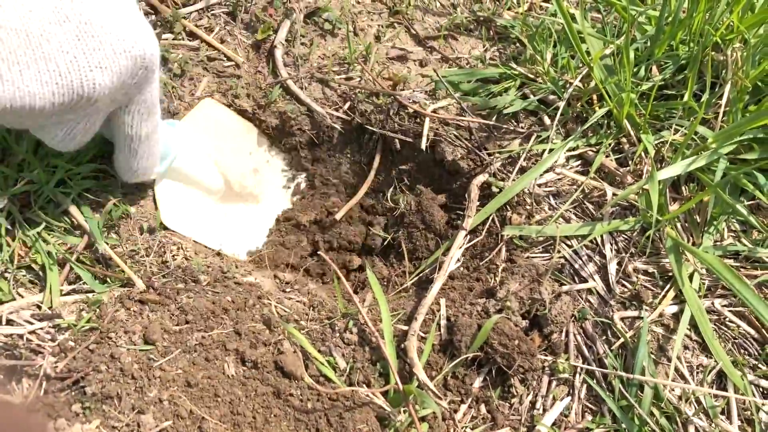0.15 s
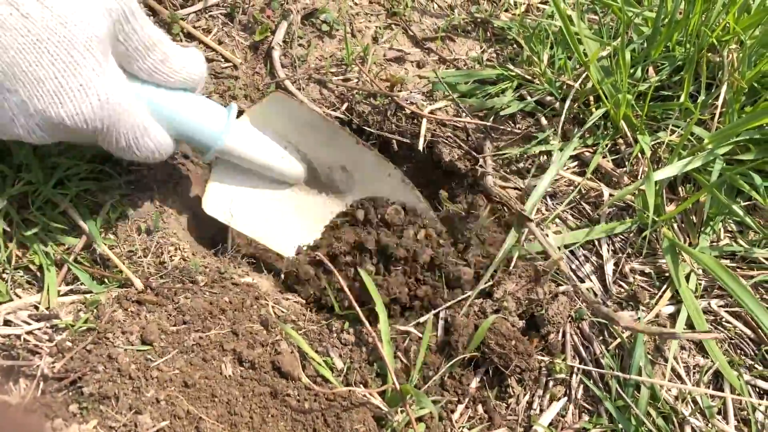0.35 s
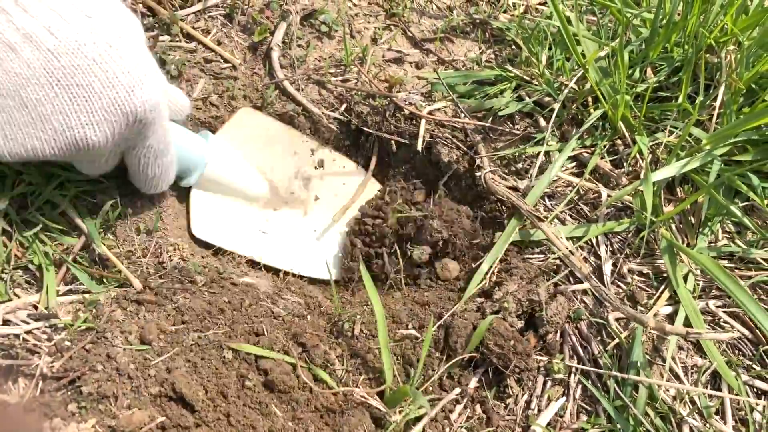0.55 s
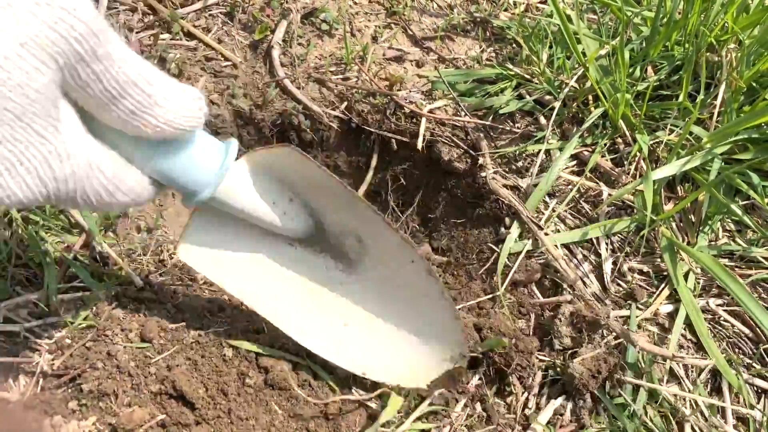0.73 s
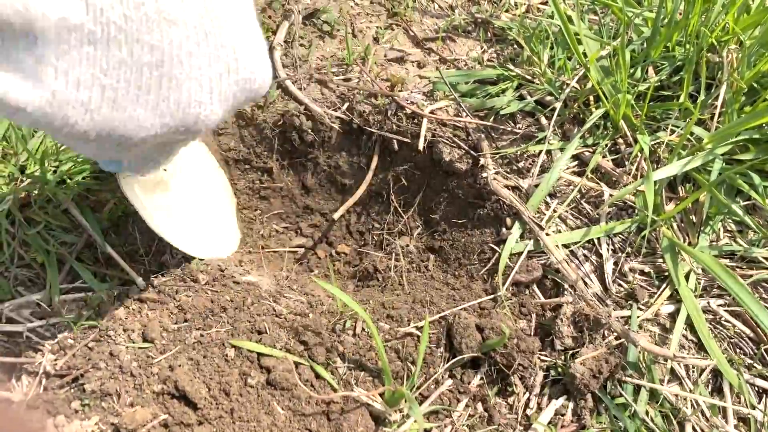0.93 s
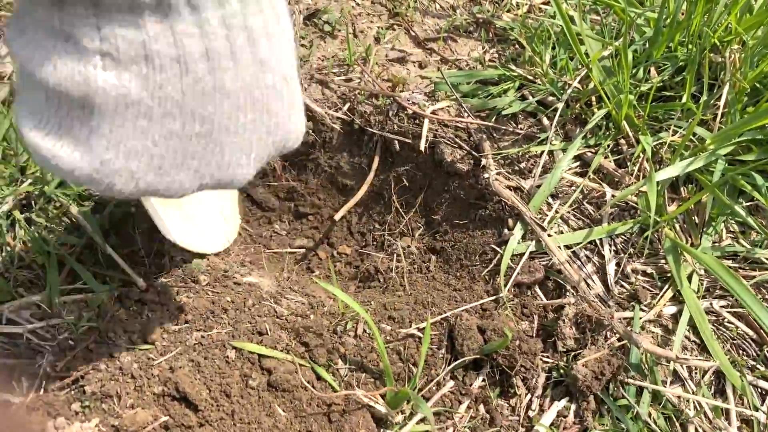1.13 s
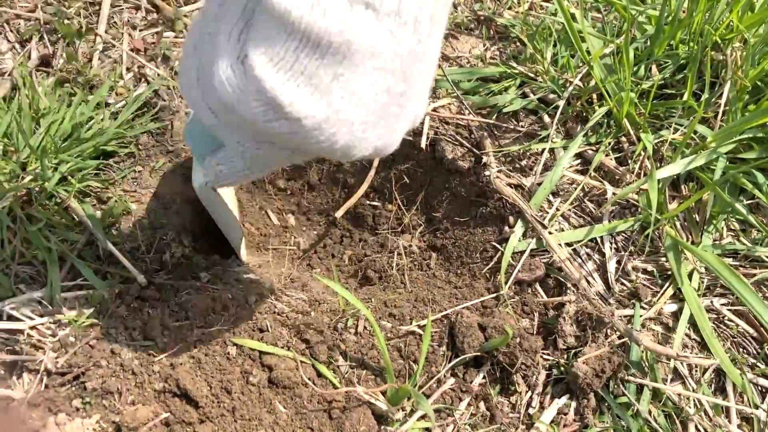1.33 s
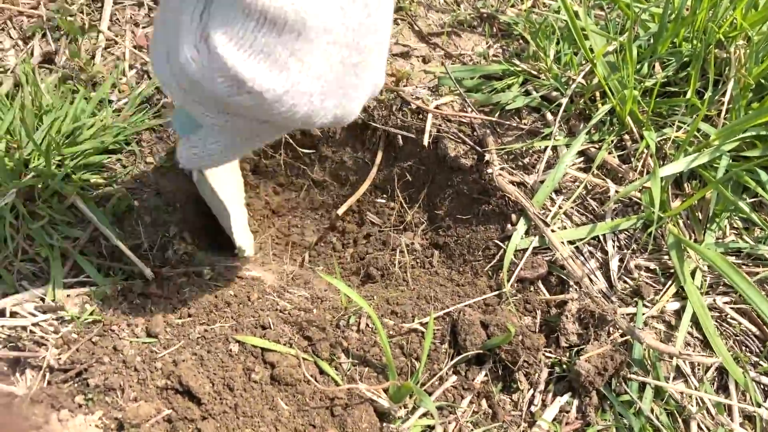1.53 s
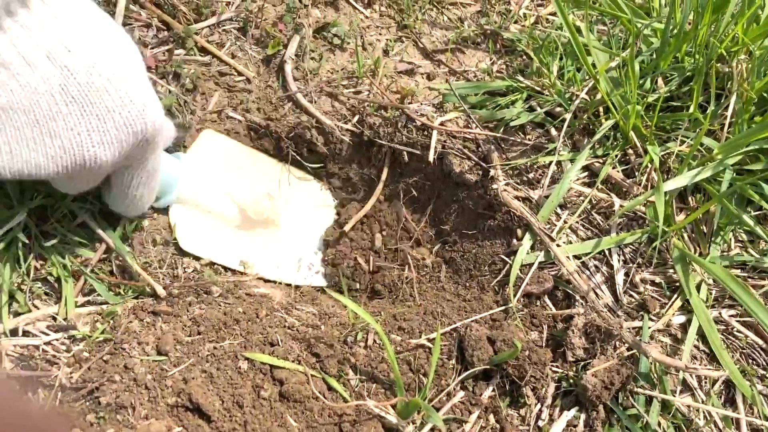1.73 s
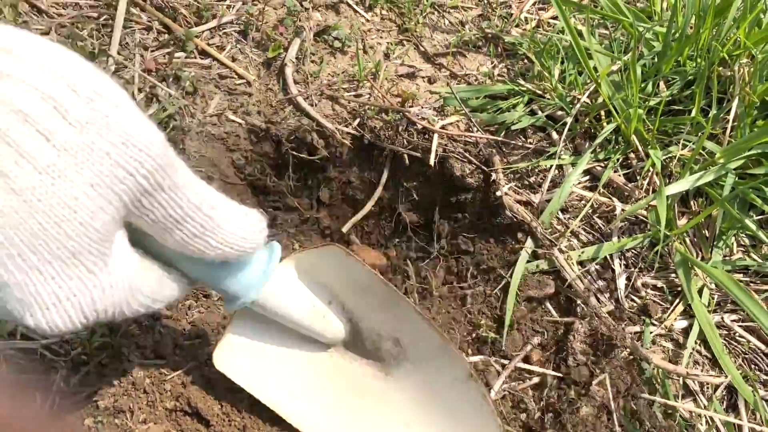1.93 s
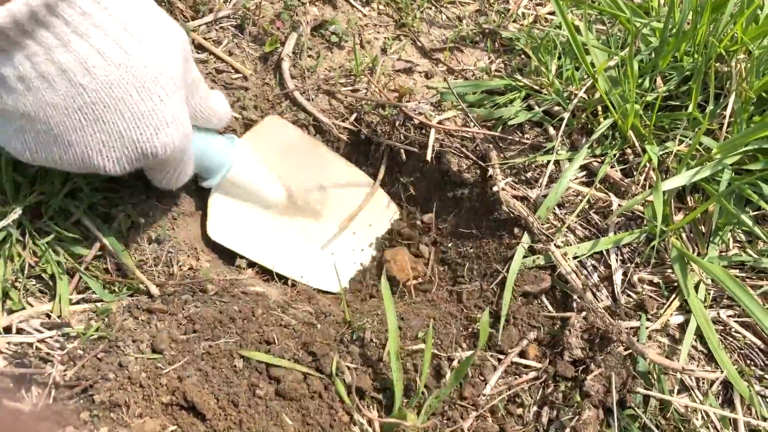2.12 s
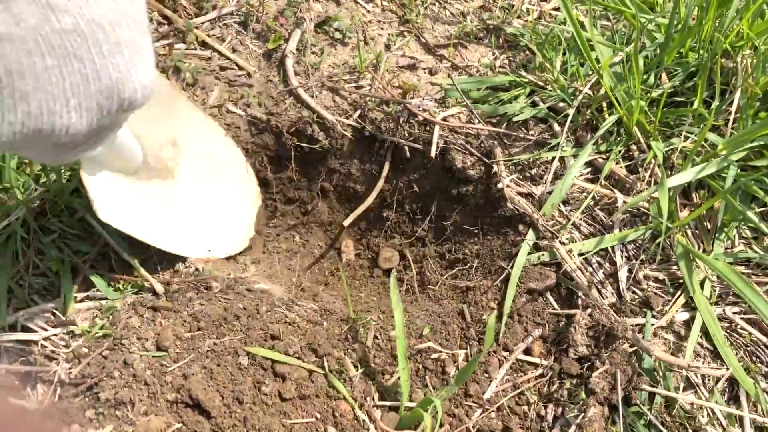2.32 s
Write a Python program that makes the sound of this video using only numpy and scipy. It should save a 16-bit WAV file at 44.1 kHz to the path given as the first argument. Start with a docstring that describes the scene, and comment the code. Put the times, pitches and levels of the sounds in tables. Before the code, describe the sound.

A hand trowel digs dry grassy soil in quick crisp scrapes, with stones clicking on its blade

```python
"""Outdoors in a garden, a hand trowel digs dry grassy soil in quick short strokes close to the microphone.
From the start grit noise grinds along the steel blade and rings its modes, while sparser, darker grains
crumble as clods; stones click on the edge, two of them hard just before 0.4 s. From 0.53 s thin tones sing
on the blade; the strongest stroke comes near 1.26 s, the strongest stone near 1.57 s, the strongest thud at
2.24 s. Filtered noise makes a low rumble and faint hiss behind it all; a drone swells near 0.5 and 1.64 s."""
import sys
import numpy as np
from scipy import signal
from scipy.fft import rfft, irfft, next_fast_len
from scipy.io import wavfile
from scipy.ndimage import uniform_filter1d, map_coordinates

SR = 44100
rng = np.random.default_rng(int(sys.argv[2]) if len(sys.argv) > 2 else 0)


def inscribe(sig):
    """Save sig as 16-bit PCM at rate SR to the path in sys.argv[1].

    A 1-D sig is mono; a 2-D sig holds one channel per row.
    Samples are clipped to [-1, 1] before scaling.
    """
    pcm = np.round(np.clip(np.atleast_2d(sig).T, -1, 1) * 32767)
    wavfile.write(sys.argv[1], SR, pcm.astype(np.int16))


def gain_from_db(level_db):
    """Convert decibel levels to linear amplitude factors (20 dB per decade)."""
    decades = np.asarray(level_db, float) / 20
    return 10 ** decades


N = 108927

# Colour of the distant rumble and air hiss. Each row: frequency in Hz, relative level in dB per Hz.
AIR_COLOUR = [(20, -15), (45, -4), (120, -0.5), (230, -3), (400, -16), (1000, -25), (4000, -30.5),
              (15000, -49), (16500, -46)]
# Drone of a distant engine. Each row: time in seconds, rms level in dB.
DRONE_LEVEL = [(.38, -66), (.5, -54.5), (.6, -67), (.72, -71), (1.32, -68.5), (1.5, -88), (1.64, -57),
               (1.8, -81), (2.47, -70)]
# The ground thuds under a hard push. Each row: start in seconds, frequency in Hz, envelope peak in dB.
GROUND_THUDS = [(0.152, 48.5, -54.5), (1.052, 170, -59), (1.49, 262, -45.5), (1.571, 342, -46),
                (2.2405, 585, -33.5)]
# Sliding grit sets one mode of the free blade singing. Each row: start in seconds, length in seconds,
# centre frequency in Hz, mean peak level in dB.
BLADE_SINGS = [(0.532, 0.017, 4670, -56), (0.715, 0.02, 5830, -47), (0.732, 0.013, 2953, -42.5),
               (0.816, 0.025, 2920, -60), (1.089, 0.042, 1960, -63.5), (1.117, 0.014, 4020, -52),
               (2.097, 0.031, 4720, -56)]
# Modes of the blade, before each contact varies them. Each row: frequency in Hz, relative level in dB,
# t60 in seconds when the contact's ring column is 0 dB.
BLADE_MODES = [(1950, -19, .04), (2570, -12, .03), (2940, -19, .06), (3880, 1, .016), (4080, 1, .02),
               (4655, -3, .04), (5300, -4, .02), (5840, -7, .035), (6225, -6, .03), (6740, -9, .03),
               (7750, -6, .025), (8830, -7, .03), (10700, -12, .03), (14220, -9, .025)]
# Colour of grit and stone clicks. Each row: frequency in Hz, relative level in dB per Hz.
GRIT_COLOUR = [(300, -80), (1300, 6.5), (2500, 4), (4000, 5.5), (8000, 5), (15700, 5), (16300, -11)]
# Colour of clods and, before sharpening, of stone knocks. Each row: frequency in Hz, relative level in
# dB per Hz.
CLOD_COLOUR = [(150, -19), (300, -6.5), (550, 6.5), (800, 5.5), (1300, 1), (2000, -8), (4000, -34.5)]
# Stones on the edge, levels before the trims in stones(). Each row: start in seconds, strength in dB,
# dull knock over click in dB, blade ring over click in dB, pitch that the contact favours in Hz.
STONE_HITS = [(0.023, -38.5, -22, -15, 3910), (0.1627, -25, -25, -2, 3930), (.208, -17, -15, -8, 6700),
              (.3885, -12.5, -11, -4.5, 4000), (0.3926, -13, -9, -7, 1260), (0.607, -13.5, -32, -16, 3700),
              (0.6476, -24.5, 2.5, -3, 1150), (0.7015, -29.5, -9, -10, 12000), (0.7323, -20, -8, -5, 2900),
              (0.9026, -27, -34, 8, 4050), (0.922, -25, -8.5, -3, 7750), (1.017, -35.5, 5, -8, 1000),
              (1.0363, -40.5, 6, -19, 800), (1.0632, -14, -12, -10, 3700), (1.2086, -14.5, -22, -6, 7850),
              (1.2657, -11, -35, -4, 3760), (1.301, -22, -7, -1.5, 3900), (1.4847, -18.5, -8.5, -14, 3640),
              (1.4938, -26, -13, 12.5, 3680), (1.569, -8, -52, 0.5, 4730), (1.9622, -22.5, 1, -8, 4070),
              (1.977, -27.5, -37, 5.5, 4020), (1.9947, -18, -46, -7, 4200), (2.1281, -24.5, -20, -6, 4630),
              (2.1685, -10.5, -50, -8.5, 7900), (2.238, -10.5, -5.5, -7.5, 4020),
              (2.2584, -22.5, -8, 1, 5840), (2.2907, -24.5, -42, -10.5, 6250),
              (2.436, -24.5, -16, -13, 2000), (2.448, -31, 0.5, -6, 5250)]
# Strokes of the trowel; rise and fall span 20 dB. Each row: full pressure at seconds, rise in seconds,
# hold in seconds, fall in seconds, grit in dB, crumbling clods over grit in dB, blade ring over grit in dB
# before the trim in strokes().
TROWEL_STROKES = [(0.024, 0.025, 0.005, 0.081, -46, -12, -2), (0.169, 0.023, 0.0066, 0.013, -43, -9, 4),
                  (0.235, 0.053, 0.016, 0.015, -46, 1, 0.5), (0.292, 0.012, 0.023, 0.077, -57, 4, 6.5),
                  (0.322, 0.0084, 0.0068, 0.022, -41.5, -16, 1),
                  (0.354, 0.022, 0.021, 0.038, -46, -5, -0.5), (0.422, 0.023, 0.0092, 0.16, -54, -10, 1.5),
                  (0.609, 0.031, 0.0021, 0.0075, -42, -9.5, 6.5),
                  (0.629, 0.019, 0.022, 0.022, -47.5, 0.5, 4.5),
                  (0.699, 0.011, 0.046, 0.034, -49.5, -11.5, -2), (0.807, 0.042, 0.018, 0.041, -57, -12, 4),
                  (0.906, 0.043, 0.02, 0.0038, -50, -12.5, -10),
                  (0.951, 0.002, 0.0029, 0.026, -65.5, 9.5, 1), (1.035, 0.04, 0.0092, 0.033, -62.5, 1, -8),
                  (1.047, 0.0052, 0.0079, 0.016, -46, 8, 5.5),
                  (1.089, 0.0094, 0.0031, 0.039, -53.5, -10.5, 5),
                  (1.115, 0.021, 0.01, 0.0045, -59, -30, 4.5), (1.186, 0.0094, 0.0048, 0.016, -58, -6, 4),
                  (1.206, 0.013, 0.0028, 0.019, -42.5, -10.5, -25),
                  (1.263, 0.017, 0.0063, 0.014, -34, -9, 0), (1.277, 0.046, 0.0066, 0.046, -46.5, 2, 7.5),
                  (1.385, 0.0059, 0.014, 0.014, -45, -11, -6), (1.491, 0.03, 0.011, 0.02, -37, -10.5, -7),
                  (1.608, 0.054, 0.0084, 0.012, -46.5, -15, -16),
                  (1.67, 0.024, 0.011, 0.059, -42, -4.5, 0.5), (1.78, 0.016, 0.0096, 0.024, -41.5, 2.5, 4),
                  (1.823, 0.026, 0.0012, 0.011, -48, 3.5, 6.5),
                  (1.866, 0.027, 0.0085, 0.016, -50.5, -7, 3.5),
                  (1.967, 0.027, 0.0024, 0.029, -38.5, -5, 4.5),
                  (2.034, 0.16, 0.0087, 0.047, -52.5, -16, -13),
                  (2.093, 0.0097, 0.038, 0.027, -59.5, -8, 7), (2.125, 0.021, .003, 0.018, -46.5, -7.5, -2),
                  (2.158, 0.036, 0.018, 0.035, -51.5, 1.5, 3), (2.244, 0.031, 0.0092, 0.032, -47, -3, 1),
                  (2.269, 0.052, 0.032, 0.13, -56.5, -18, -20), (2.408, 0.008, 0.039, 0.019, -56, -10.5, 5)]

PATCHY_DB = 4  # rms depth of the random patches
CLICK_OCTAVES = 1.1  # half width of a stone click, and reach of its damping of distant modes


def unit(x):
    """Scaled to rms 1."""
    return x / np.sqrt(np.mean(x ** 2) + 1e-20)


def coloured(x, points):
    """Causal minimum-phase filter shaped by (Hz, dB) points, keeping the power of white noise."""
    size = next_fast_len(len(x) + 8192)
    hz, db = np.transpose(points)
    gain = gain_from_db(np.interp(np.log(np.fft.rfftfreq(size, 1 / SR) + 1), np.log(hz + 1), db))
    # folding the cepstrum onto positive time makes the phase minimal
    cepstrum = irfft(np.log(unit(gain)), size)
    cepstrum[1:size // 2] *= 2
    cepstrum[size // 2 + 1:] = 0
    response = np.exp(rfft(cepstrum))
    return irfft(rfft(x, size) * response, size)[:len(x)]


def wobble(rate):
    """A smooth random curve, rate knots a second."""
    knots = rng.standard_normal(N // 40 + 4)
    return map_coordinates(knots, [np.arange(N) * rate / SR])


def grains(per_s, spread_db):
    """Dense tiny impacts of unequal size and random sign, rms 1."""
    hit = rng.random(N) < per_s / SR
    size = np.minimum(rng.exponential(size=N), 3)
    sign = rng.standard_normal(N)
    return unit(hit * gain_from_db(spread_db * size) * sign)


def patchy(x, depth_db, size=256):
    """Random patches of gain over frequency and time, finer in time for a small size."""
    spectrum = signal.stft(x, nperseg=size)[2]
    field = rng.standard_normal(spectrum.shape)
    field = uniform_filter1d(field, size=5, axis=0)
    field = uniform_filter1d(field, size=4, axis=1)
    gain = unit(gain_from_db(depth_db * unit(field)))
    return signal.istft(spectrum * gain, nperseg=size)[1][:N]


def air():
    """Distant low rumble and faint hiss: coloured noise whose level sways slowly."""
    level = gain_from_db(-62 + 1 * wobble(6.28))  # dB, with a sway in dB
    return level * coloured(rng.standard_normal(N), AIR_COLOUR)


def engine_drone():
    """A distant engine: one low tone that wavers in pitch, swells and fades."""
    centre_hz, width_hz = 87, 12
    hz = centre_hz + width_hz / 2 * wobble(24.59)
    level = gain_from_db(np.interp(np.arange(N) / SR, *np.transpose(DRONE_LEVEL)))
    return level * np.sqrt(2) * np.sin(2 * np.pi * np.cumsum(hz) / SR)


def thuds():
    """The pushed ground gives a few soft cycles that swell briefly and die fast."""
    out = 0
    for start, hz, db in GROUND_THUDS:
        cycles = np.maximum(np.arange(N) / SR - start, 0) * hz
        age = cycles / 1.25  # the envelope peaks after 1.25 cycles
        envelope = gain_from_db(db) * np.e * age * np.exp(-age)
        out = out + envelope * np.sin(2 * np.pi * cycles)
    return out


def singing():
    """A single blade mode as a thin, slightly rough tone that starts fast and rings out."""
    rise_s, fall_s, width_hz, rough_db = 0.0026, 0.0079, 37, 1.9  # rise and fall span 20 dB
    t, out = np.arange(N) / SR, 0
    for start, length, hz, db in BLADE_SINGS:
        before = np.maximum((start - t) / rise_s, 0)
        after = np.maximum((t - start - length) / fall_s, 0)
        pitch = hz + width_hz / 2 * wobble(100)
        tone = np.sin(2 * np.pi * np.cumsum(pitch) / SR)
        out = out + gain_from_db(db - 20 * (before + after) + rough_db * wobble(79.4)) * tone
    return out


def add_ring(out, push, start, ring_db, scatter_db, favoured_hz=None):
    """The blade answers a push with its modes, at new strengths and slightly new pitches each time."""
    favour_db, favour_octaves = 6, .12  # lift and reach of the favoured modes
    detune = .005  # grip and soil load shift every mode a little, as a fraction
    freedom = .5  # dB of ring time per dB of ring: soil on the blade both quietens and shortens it
    t = np.arange(SR // 8) / SR
    hz, db, t60 = np.transpose(BLADE_MODES)[:, :, None]
    db = db + scatter_db * rng.standard_normal(hz.shape)
    if favoured_hz:
        octaves = np.log2(hz / favoured_hz)
        lift = np.exp(-(octaves / favour_octaves) ** 2)
        db = db + favour_db * (lift - (octaves / CLICK_OCTAVES) ** 2)
    hz = hz * (1 + detune * rng.standard_normal(hz.shape))
    decay = gain_from_db(db - 60 * t / (t60 * gain_from_db(freedom * ring_db)))
    modes = decay * np.sin(2 * np.pi * (hz * t + rng.random(hz.shape)))
    ring = np.sum(modes, axis=0)
    ring = gain_from_db(ring_db) * ring / np.linalg.norm(ring)
    answer = signal.fftconvolve(push, ring)[:N - start]
    out[start:start + len(answer)] += answer


def stones():
    """Each stone is a short crunch, longer if strong: a toned click, a dull knock, two blows on the blade."""
    strength_trim_db, knock_trim_db, ring_trim_db = -12.5, 23.5, 7
    rise_s = 0.00094  # time constant
    full_fall_s, fall_grows = 0.0061, 0.17  # 20 dB fall at strength 0 dB; dB of fall time per dB of strength
    t = np.arange(SR // 40) / SR
    click, knock, ring = np.zeros((3, N))
    for start, db, knock_db, ring_db, hz in STONE_HITS:
        a = round(start * SR)
        fall_s = full_fall_s * gain_from_db(fall_grows * db)
        shape = gain_from_db(-20 * t / fall_s) * (1 - np.exp(-t / rise_s))
        crunch = np.sign(rng.standard_normal((2, len(t))))
        contact = gain_from_db(db + strength_trim_db) * shape * crunch
        strength = np.linalg.norm(contact[0])

        band = np.minimum(hz * 2 ** (CLICK_OCTAVES * np.array([-1, 1])), [9000, 20000])
        toned = signal.lfilter(*signal.butter(2, band, "bandpass", fs=SR), contact[0])
        click[a:][:len(t)] += (toned * strength / np.linalg.norm(toned))[:N - a]
        knock[a:][:len(t)] += (contact[1] * gain_from_db(knock_db + knock_trim_db))[:N - a]

        blows = np.zeros(SR // 400)
        blows[[8, rng.integers(30, len(blows))]] = .8
        push = blows * strength * gain_from_db(ring_trim_db)
        add_ring(ring, push, a, ring_db, scatter_db=2.5, favoured_hz=hz)
    hard_knock = np.gradient(coloured(knock, CLOD_COLOUR))  # harder than a clod: less bass
    return patchy(coloured(click, GRIT_COLOUR), PATCHY_DB) + hard_knock + ring


def grit_grains():
    """Dense grit impacts whose level flutters as the grip on the soil slips and catches."""
    return grains(per_s=14000, spread_db=2.6) * unit(gain_from_db(1.5 * wobble(220)))


def strokes():
    """Pressure rises, holds and falls; it drives hissing grit, crumbling clods and the ringing blade."""
    ring_trim_db = -2.5
    t = np.arange(N) / SR
    grit_power, clod_power, ring = np.zeros((3, N))
    rub = grit_grains()
    for start, rise, hold, fall, db, clod_db, ring_db in TROWEL_STROKES:
        before = np.maximum((start - t) / rise, 0)
        after = np.maximum((t - start - hold) / fall, 0)
        pressure = gain_from_db(db - 20 * (before + after))
        grit_power = grit_power + pressure ** 2
        clod_power = clod_power + (pressure * gain_from_db(clod_db)) ** 2
        a, b = max(round((start - .15) * SR), 0), round((start + .25) * SR)
        push = (pressure * rub)[a:b] * gain_from_db(ring_trim_db)
        add_ring(ring, push, a, ring_db, scatter_db=3)
    hiss = patchy(grit_grains(), 3.8, size=64)  # each crumb has its own colour
    crumble = grains(per_s=3200, spread_db=2.5)
    grit = coloured(np.sqrt(grit_power) * hiss, GRIT_COLOUR)
    clods = coloured(np.sqrt(clod_power) * crumble, CLOD_COLOUR)
    return patchy(ring, PATCHY_DB) + patchy(grit + clods, PATCHY_DB)


def scene():
    """Everything reaches one microphone, outdoors, without echo."""
    background = air() + engine_drone()
    digging = thuds() + singing() + stones() + strokes()
    return (background + digging)[None]


def low_pass(x):
    """Removes everything above the highest recorded frequency."""
    return signal.sosfilt(signal.butter(12, 17010, fs=SR, output="sos"), x)


def record(dry):
    """The microphone's single channel, as it is finally heard."""
    return low_pass(dry)


dry = scene()
out = record(dry)
inscribe(out)
```